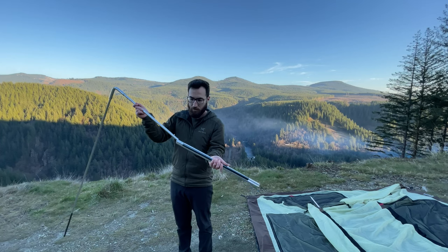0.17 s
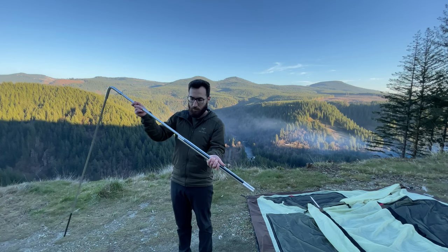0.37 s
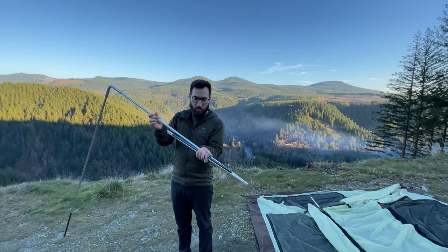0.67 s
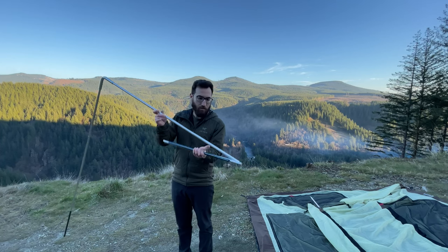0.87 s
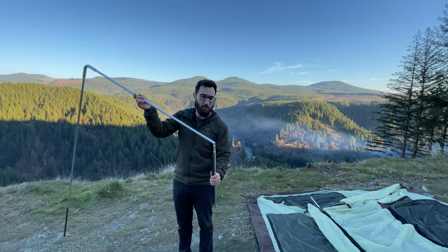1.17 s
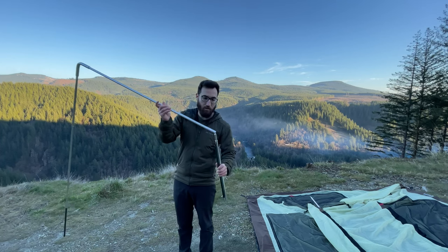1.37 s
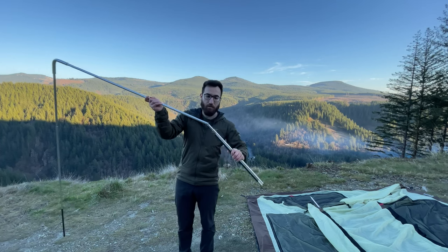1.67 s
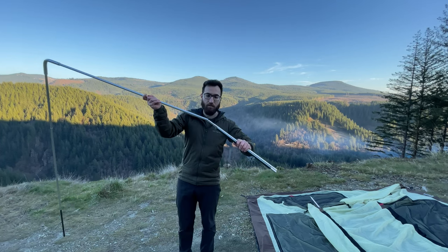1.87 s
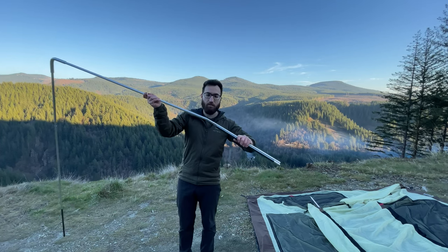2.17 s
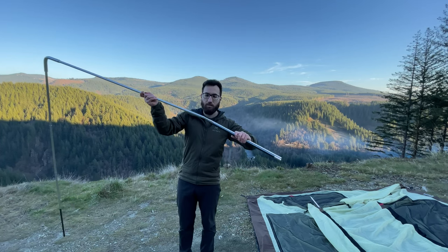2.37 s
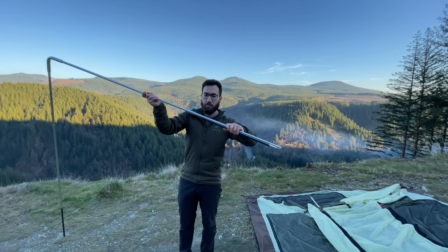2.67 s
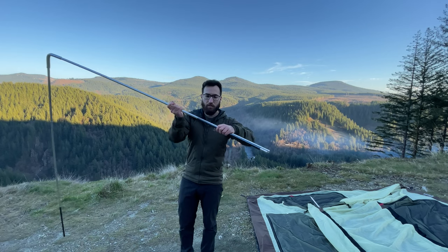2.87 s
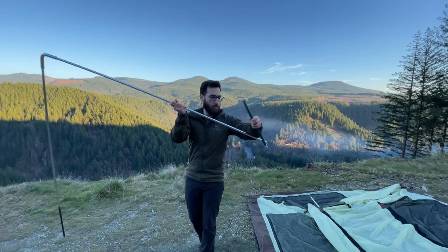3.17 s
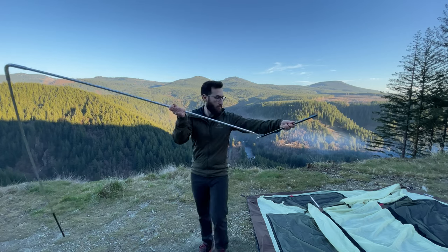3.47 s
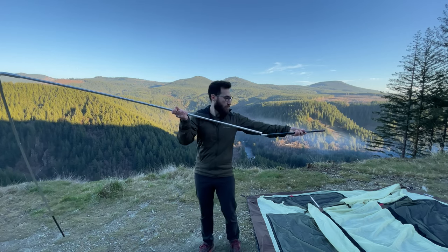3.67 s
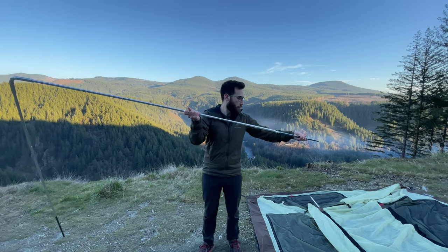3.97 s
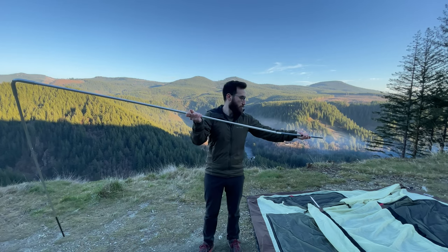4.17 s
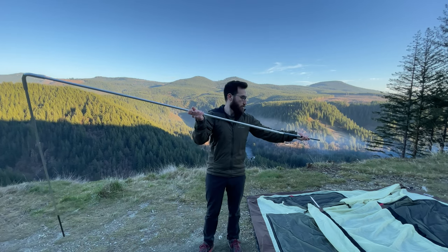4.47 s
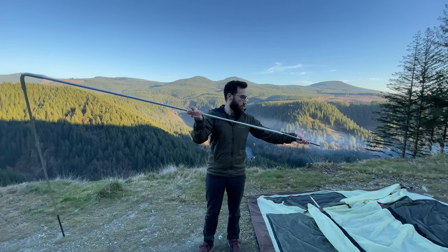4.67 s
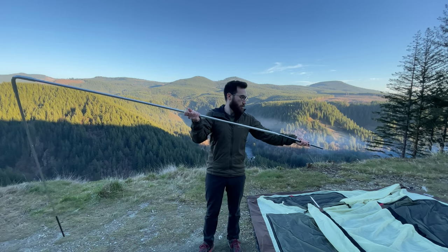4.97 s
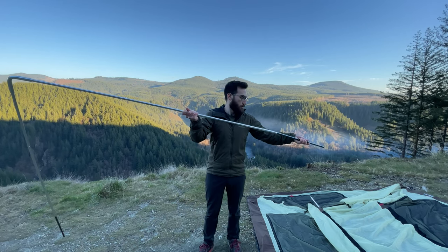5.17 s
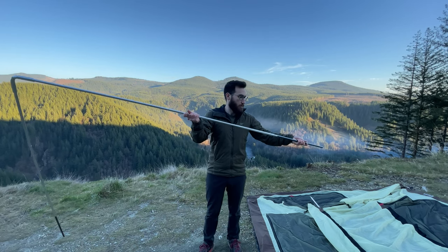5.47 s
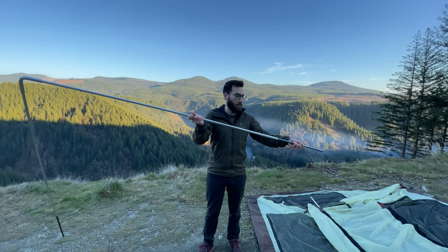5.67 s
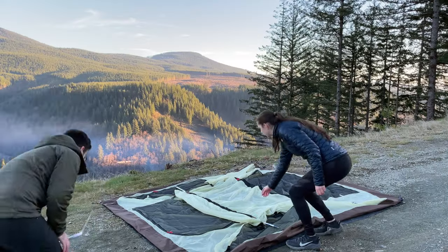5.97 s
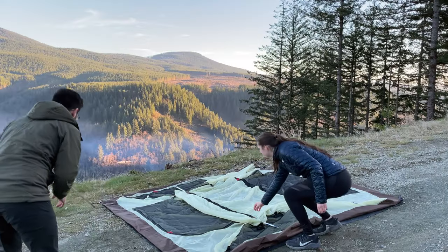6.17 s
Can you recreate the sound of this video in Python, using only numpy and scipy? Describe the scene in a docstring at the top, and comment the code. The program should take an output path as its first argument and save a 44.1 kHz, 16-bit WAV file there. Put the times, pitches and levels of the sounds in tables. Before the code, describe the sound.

A few metres away on an open hillside, hollow aluminium pole sections are fitted together. A flurry of clicks ends in a hard snap, then lighter taps, scrapes and a loose ringing rattle follow. Further loud snaps come at uneven gaps, with quiet handling and sleeve rustle between. A faint valley hush and low wind thumps sit beneath; the stereo pickup briefly overloads on the sharpest snap.

```python
"""Tent poles on a hillside

Aluminium pole sections snap together on their cord, a few metres from two microphone ports on an open hillside.
Knocks and slides are trains of uneven contacts ringing the hand-damped modes of the tube; a section loose on
the cord rings longer. Between them the tube creeps, sleeves rustle and handling ticks faintly, all shaped noise
or sparse clicks. A valley hush of banded noise lies below; low noise swings are wind on the ports and the
overload rumble under the loudest snaps."""
import sys
import numpy as np
from scipy import signal
from scipy.io import wavfile
from scipy.ndimage import uniform_filter1d

SR = 44100
rng = np.random.default_rng(int(sys.argv[2]) if len(sys.argv) > 2 else 0)


def materialize(psi):
    """Save the field psi as 16-bit PCM at rate SR to the path in sys.argv[1].

    A 1-D psi becomes a single channel; in a 2-D psi each row is a channel.
    """
    bounded = np.clip(np.atleast_2d(psi).T, -1, 1)
    quanta = np.round(bounded * 32767).astype(np.int16)
    wavfile.write(sys.argv[1], SR, quanta)


N = 278488  # samples, about 6.3 s

# Valley hush below the slope. Each row: time in seconds, level in dB.
HUSH_LEVEL = [(0.0, -47.5), (0.63, -45.5), (2.83, -45), (3.02, -44), (3.65, -43.5), (4.15, -45),
              (4.85, -44.5), (6.31, -44.5)]
# Its colour. Each row: frequency in Hz, relative density in dB per Hz.
HUSH_COLOUR = [(47, -42.5), (80, -9.5), (291, -1.5), (355, 9.5), (441, -13), (515, -5), (669, -7.5),
               (780, -9.5), (870, -9), (1640, -19), (2230, -43.5), (15000, -84.5)]
# How alike the two ports hear hush and rustle. Each row: frequency in Hz, likeness from -1 to 1.
PORT_LIKENESS = [(60, -0.32), (130, 0.77), (290, 0.6), (640, 0.26), (1410, 0.17), (3100, 0.72),
                 (6820, 0.07), (15000, 0.36)]
# Breeze on the ports. Each row: time in seconds, flutter level in dB, rumble level in dB.
BREEZE = [(0.0, -60, -77), (0.32, -61.5, -80.5), (1.02, -55, -77), (1.14, -54, -71), (1.3, -61, -69.5),
          (1.56, -82.5, -95.5), (1.77, -80, -95.5), (2.07, -62.5, -92), (2.48, -70, -99), (3.27, -60, -91),
          (3.65, -60, -77), (3.9, -63.5, -90.5), (4.32, -64, -92), (4.66, -63, -75.5), (5.17, -53.5, -66),
          (5.52, -62.5, -75), (6.12, -58.5, -82), (6.31, -61, -67)]
# Short low thumps: gusts on the ports, and the overload rumble under the loudest snaps.
# Each row: centre in seconds, rumble in dB, flutter in dB, length in ms, left over right in dB.
THUMPS = [(.03, -49, -59, 35, -2), (.545, -50, -59, 51, -5), (.615, -55, -35, 45, 2),
          (.70, -82, -35, 53, 2), (1.0, -55, -45, 190, 4.5), (1.111, -61, -38.5, 110, 1.5),
          (1.25, -73, -40, 170, 7.5), (1.345, -36, -41.5, 81, 14), (1.40, -48, -50, 56, 7),
          (1.88, -62.5, -48, 51, 4), (2.681, -59, -58, 72, 5.5), (3.57, -72, -40.5, 380, 3.5),
          (3.86, -70, -45.5, 45, 6), (4.55, -65, -54.5, 165, 16), (4.73, -59, -57, 54, 7.5),
          (4.88, -62, -42, 44, 8), (4.95, -50, -47, 250, 6.5), (5.093, -34, -35.5, 74, 5),
          (5.22, -69, -44, 47, -5.5), (5.379, -76.5, -42.5, 60, 1), (5.78, -57.5, -63.5, 98, -2),
          (6.25, -54, -61, 110, -6.5)]
# Handling. Each row: time in seconds, level of the creeping tube in dB, level of the sleeve rustle in dB.
HANDLING = [(0.0, -72, -78), (0.14, -67.5, -96), (0.26, -59, -86), (0.41, -60, -81), (0.55, -47, -74),
            (0.81, -66, -66), (1.02, -53.5, -78), (1.2, -68, -73), (1.53, -53, -73), (1.67, -62.5, -89),
            (1.8, -69, -96.5), (2.52, -65, -88), (2.67, -55, -58), (2.78, -56.5, -65), (3.14, -58, -65),
            (3.4, -62.5, -67), (4.05, -64, -80.5), (4.26, -74, -82), (5.02, -84, -90.5), (5.22, -63, -80),
            (5.46, -65, -72.5), (5.84, -64, -85.5)]
# Handling over the last half second, columns as above.
HANDLING_END = [(5.855, -58, -62), (6.063, -61, -59.5), (6.31, -56, -66)]
# Colour of the rustle as it reaches the ear. Each row: frequency in Hz, relative density in dB per Hz.
RUSTLE_COLOUR = [(1180, -37), (2000, -16.5), (2470, -10), (3800, -17), (6530, -14.5), (8190, -26),
                 (9580, -3.5), (13000, -7)]
# Ringing of a section hanging loose on the cord. Each row: start in seconds, level in dB.
LOOSE_KNOCKS = [(0.873, -43), (0.979, -35), (2.889, -50), (2.9987, -50), (3.03, -49.5), (3.153, -42),
                (4.4865, -34.5), (5.9313, -50)]
# Its modes. Each row: frequency in Hz, relative level in dB, time to fall 60 dB in seconds.
LOOSE_MODES = [(2630, -1.5, 0.061), (2890, 0, 0.052), (3634, -1, 0.08), (4690, -4, 0.054),
               (5300, -5.5, 0.062), (5600, -14, .045), (6930, -3, 0.041)]
# Modes of the hand-held tube. Each row: frequency in Hz, relative level in dB.
TUBE_MODES = [(350, -19), (520, -15.5), (700, -17.5), (900, -15.5), (1110, -0.5), (1310, -10), (1550, 4),
              (1850, 1), (2100, 3.5), (2370, 5.5), (2630, 3.5), (2900, 2), (3250, -1), (3550, -0.5),
              (3900, 0.5), (4200, -1.5), (4550, -0.5), (4900, -14.5), (5260, 0), (5600, -2), (6030, 0),
              (6660, -0.5), (7070, -7.5), (7700, -14), (8840, -9.5), (9450, -5.5), (10100, -5.5),
              (11300, -5), (11900, -20), (13500, -18.5), (15300, -6.5)]
# Slides of tube through ferrule and hand. Each row: time in seconds, level in dB, favoured pitch in Hz, modes
# near 2.5 kHz and near 10 kHz against those near 6 kHz in dB, rattle time in ms.
SLIDES = [(.432, -41.5, 5440, 9, -7, 17), (.455, -36.5, 2290, -11, -2, 28),
          (.79, -46, 3020, -5, -4, 180), (.85, -35.5, 1820, -14, -12, 29),
          (.875, -34.5, 2880, 1, -17, 14), (1.07, -48.5, 5370, -1, -8, 65),
          (2.655, -32, 5850, -11, -4, 35), (2.90, -41, 3500, -4, 6, 16),
          (3.05, -50, 2530, 15, -16, 41), (3.22, -46, 2300, -1, -8, 50),
          (3.275, -42.5, 1300, 14, -19, 46), (3.44, -45.5, 2380, 3.5, 24.5, 19),
          (3.668, -38, 1550, 0.5, 20.5, 41), (3.75, -50.5, 4960, -3.5, -5.5, 64),
          (3.82, -46.5, 6220, -4, -3, 19), (3.865, -50, 4400, 2.5, -13, 14.8),
          (4.476, -41, 4400, -2, -17, 8.6), (5.535, -38, 5243, -11.5, 11.5, 57),
          (5.94, -49, 5240, -8, 2, 28), (6.075, -43.5, 4200, 1, 15, 50),
          (6.22, -47, 5440, -12, 18.5, 47), (6.28, -44.5, 4120, 9, 19, 46)]
# Knocks of tube on tube, columns as for the slides.
KNOCKS = [(.194, -28, 2274, 4, -14, 1.6), (.2473, -25.5, 2630, -8, -19, 4.2),
          (.3044, -31, 1820, -14, -15, 3.1), (.3115, -24, 5660, -12, -21, 1.7),
          (.3196, -17, 5700, -13.5, -6, 3.3), (.3245, -24.5, 6300, -12, -5, 3.7),
          (.4459, -17, 5680, -13, 0, 2.8), (.4744, -37, 2410, 5, 12, 1.7), (.505, -23, 2630, -1, -9, 1.2),
          (.5418, -6, 2700, -5, 8.5, 3.8), (.5472, -8, 2237, -7.5, -7, 2.7),
          (.585, -30, 2336, -8, -12, 2.7), (.9312, -52, 4910, -10, 10, 2.7),
          (.9514, -40, 5130, -4, 10, 2.1), (.9783, -22.5, 2670, -9, -1, 2.5),
          (1.132, -23.5, 1950, -6.5, -4.5, 4.2), (1.202, -41.5, 2960, -3, -12, 1.3),
          (1.211, -37, 4200, -5, -21, 0.94), (1.239, -44, 4330, -9, -8, 3.4),
          (1.249, -44, 3500, -5, -8, 1.3), (1.4254, -41, 4400, -12, -10, 1.5),
          (1.5125, -35, 4200, -6, 1, 0.87), (1.54, -37.5, 1780, -3, -1, 0.82),
          (1.572, -28, 2540, -3, -26, 1.37), (1.6098, -44, 3860, -15, -11, 3.6),
          (1.6426, -39, 2490, -13.5, -6.5, 2.1), (2.0218, -41.5, 2050, 0, -12.5, 1),
          (2.059, -41.5, 1990, -4, -1, 3.8), (2.0756, -29.5, 2220, -1, -4, .92),
          (2.169, -14, 6940, -10, 0.5, 1.55), (2.4632, -47, 1910, -6, 6, 3.2),
          (2.4758, -42, 2900, 6.5, 7, 0.94), (2.526, -46.5, 2790, -5, 0.5, 9),
          (2.58, -44, 2210, -12, -6, 5.2), (2.675, -5.5, 2390, -6.5, 10, 3.8),
          (2.68, -6, 2670, -17, 0, 4.8), (2.7994, -44.5, 2420, -15, -19, 2.5),
          (2.891, -37.5, 4500, -15, -6, 5.2), (2.9487, -47, 1710, -17, -9, 2.9),
          (2.9987, -34, 3470, -12, -8, 5.2), (3.028, -34, 2630, -5, -5, 9.4),
          (3.1535, -42, 2560, -1, -20.5, 3.1), (3.176, -38, 2960, 3.5, -6, 3.7),
          (3.9761, -18.5, 4510, -15.5, -6.5, 2.6), (4.1616, -24.5, 2120, -8.5, -14, 3),
          (4.4885, -13, 5940, -7, 3.5, 2.9), (5.1294, -58.5, 1580, -5.5, -13.5, 2.4),
          (5.1756, -50.5, 1543, 7, -17.5, 1.8), (5.218, -48.5, 1878, 5.5, -23.5, 2),
          (5.2772, -40, 4730, -10, -0.5, 0.81), (5.344, -49, 1566, -4, -5, 1.8),
          (5.3594, -50, 1700, -11.5, 10, 3), (5.4096, -54.5, 1520, -11, -2.5, 2.6),
          (5.5692, -1.5, 7200, -23.5, -2.5, 2.6), (5.5752, -16, 6040, -1.5, 1, 2.7),
          (5.8506, -51.5, 1560, -9, 7, 2.7), (5.8835, -44.5, 1600, 0, 6, 2.4),
          (5.9306, -45, 5800, -9.5, -6, 3.1), (5.972, -51, 4300, -2.5, -4, 2.5),
          (6.11, -39.5, 4140, -7, -21, 2.3), (6.1566, -42, 1590, 4, -12, 5.9)]

LUMPY_DB, LUMPS_PER_S = 7, 18  # spread of the wind level, and how fast it wanders
WIND_LEFT_DB, VEER_DB = 3.5, 2.5  # breeze, left over right, and its wandering
GROUND_S, GROUND_DB = .0056, -13  # delay and level of the ground echo
SLOPE_T60_S, SLOPE_DB = .36, -32.5  # time for the slope scatter to fall 60 dB, and its level
GRIP_T60_S = .014  # hands damp a 2.5 kHz mode by 60 dB in this time, higher ones faster
PORT_LEAD_S = .00002  # the left port hears the pole first by this much
PORT_TURN = 0.39  # radians: the left is turned ahead by this, the right back by as much
POLE_LEFT_DB, POLE_SWAY_DB = 2.5, 1.2  # pole, left over right, and its spread from touch to touch
SOFT_DB, THINNING = -40, .35  # above this level, modes near 1.4 kHz lose so many dB per dB of strength
LOW_SHARE = 0.81  # modes near 1.4 kHz follow those near 2.5 kHz by this share
DIP_4K_DB = 1  # modes near 4 kHz, added to half the 2.5 kHz strength
CUTOFF_HZ = 16400  # the recorder is 60 dB down from here up


def from_db(db):
    """Decibels to gain."""
    return 10 ** (np.asarray(db) / 20)


def rms_one(x):
    """Scales to unit rms."""
    return x / np.sqrt(np.mean(x ** 2) + 1e-20)


def in_time(rows):
    """Columns of a curve table, one value a sample."""
    s, *columns = np.transpose(rows)
    return [np.interp(np.arange(N) / SR, s, column) for column in columns]


def at_hz(points, hz):
    """Reads a spectrum table on a log-frequency axis."""
    f, value = np.transpose(points)
    return np.interp(np.log(hz), np.log(f + 1), value)


def band(x, low_hz, high_hz):
    """Band-pass."""
    return signal.sosfilt(signal.butter(2, [low_hz, high_hz], "band", fs=SR, output="sos"), x)


def drift(rate_hz):
    """Slow random wandering of spread 1: noise smoothed twice, one value every 40 samples, then joined up."""
    r = np.exp(-80 * np.pi * rate_hz / SR)
    noise = rng.standard_normal(N // 40 + 2002)
    slow = signal.lfilter([1], [1, -2 * r, r * r], noise)[2000:]  # settled part only
    return np.interp(np.arange(N) / 40, np.arange(len(slow)), rms_one(slow))


def banded_noise(spectrum, patchy_db, flicker_hz):
    """Half-octave bands of stereo noise, each with its own level, flicker and likeness; rms 1."""
    out = 0
    together = drift(flicker_hz)
    edges = 60 * 2 ** np.arange(0, 8.3, .5)
    white = rng.standard_normal((2, 2, N))
    for k, (low, high) in enumerate(zip(edges, edges[1:])):
        mid, side = band(white[k % 2], low, high)
        hz = np.sqrt(low * high)
        alike = np.clip(at_hz(PORT_LIKENESS, hz), -1, 1)
        flicker_db = patchy_db * (together + drift(flicker_hz))
        gain = from_db(at_hz(spectrum, hz) + flicker_db)
        out = out + gain * (np.sqrt(1 + alike) * mid + np.sqrt(1 - alike) * side * [[1], [-1]])
    return rms_one(out)


def valley_hush():
    """Distant hush from below: gently flickering banded noise without its lowest bass, a little to the left."""
    hush = from_db(in_time(HUSH_LEVEL)[0]) * banded_noise(HUSH_COLOUR, patchy_db=0.89, flicker_hz=8.8)
    high_pass = signal.butter(8, 125, "high", fs=SR, output="sos")
    return signal.sosfilt(high_pass, hush) * from_db([[1.2], [-1.2]])


def wind_and_thumps():
    """Lumpy low swings of wind, with short thumps of gusts and overload, partly opposed between the two ports."""
    flutter_db, rumble_db = np.array(in_time(BREEZE)) + LUMPY_DB * drift(LUMPS_PER_S)
    pan_db = WIND_LEFT_DB + VEER_DB * drift(LUMPS_PER_S)
    sides = np.array([[.5], [-.5]])
    swings = from_db(np.stack([rumble_db, flutter_db])[:, None] + sides * pan_db)
    for s, low_db, high_db, ms, left_db in THUMPS:
        bump = np.exp(-2 * ((np.arange(N) / SR - s) * 2000 / ms) ** 2)
        swings = swings + from_db(np.reshape([low_db, high_db], (2, 1, 1)) + sides * left_db) * bump
    shared = rng.standard_normal((2, N))
    own = rng.standard_normal((2, 2, N))
    push = 0.95 * shared[:, None] * [[1], [-1]] + own
    rumble = rms_one(band(band(band(push[0], 39, 75), 46, 110), 38, 100))
    flutter = rms_one(band(band(push[1], 85, 240), 74, 250))
    return swings[0] * rumble + swings[1] * flutter


def hillside(x):
    """Open-air surroundings: one dulled echo off the ground, then faint scatter from slope and trees."""
    lag = round(GROUND_S * SR)
    ground = band(np.pad(x, ((0, 0), (lag, 0)))[:, :N], 910, 12000)
    t = np.arange(SR // 2) / SR
    scatter = band(rng.standard_normal((2, len(t))), 2000, 10000)
    scatter = scatter * from_db(-60 * t / SLOPE_T60_S) * (t > .012)
    scatter = scatter / np.sqrt(np.sum(scatter ** 2) / 2)
    blurred = x * rms_one(band(rng.standard_normal(N), 100, 2000))  # stirring foliage smears the tones
    slope = signal.fftconvolve(blurred, scatter, axes=1)[:, :N]
    return x + from_db(GROUND_DB) * ground + from_db(SLOPE_DB) * slope


def sleeve_rustle(level_db):
    """Rustle of the sleeves: flickering banded noise, steeply cut above 13 kHz."""
    rustle = from_db(level_db) * banded_noise(RUSTLE_COLOUR, patchy_db=1.2, flicker_hz=15)
    return signal.sosfilt(signal.butter(10, 13000, fs=SR, output="sos"), rustle)


def handling_ticks(level_db):
    """Faint ticks of handling, tube and sleeve together: sparse tiny clicks, in clumps."""
    chance = 250 * from_db(5.0 * drift(8)) / SR  # about 250 a second, more in the clumps
    sizes = from_db(3.3 * np.minimum(rng.exponential(1, N), 4))
    ticks = (rng.random(N) < chance) * sizes * rng.choice([-1, 1], N)
    click = band(ticks + 1e-18, 1500, 6600)
    return from_db(level_db) * rms_one(click) * from_db([[1.5], [-1.5]])


def tube_ring(gain_db, size=1024, count=3):
    """One tap as it reaches each port: neighbouring sections ring each mode slightly apart, from different spots."""
    mode_hz, mode_db = np.transpose(TUBE_MODES)
    hz = np.repeat(mode_hz, count)[:, None]
    level_db = np.repeat(mode_db + gain_db, count)[:, None]
    hz = hz * (1 + .03 * rng.standard_normal(hz.shape))
    t = np.arange(size) / SR
    # half of the phase difference between the ports
    lead = PORT_TURN + np.pi * hz * PORT_LEAD_S + .3 * rng.standard_normal(hz.shape)
    fade = from_db(level_db - 60 * t / GRIP_T60_S * np.sqrt(hz / 2500))
    start = rng.uniform(0, 2 * np.pi, hz.shape)
    return np.sum(fade * np.sin(2 * np.pi * hz * t + start + np.stack([lead, -lead])), axis=1)


def creeping(level_db):
    """Faint gritty slips of the tube in the hands; the grip shifts, so four settings of the modes share them."""
    grit_db = 5.6 * np.minimum(rng.exponential(1, N), 6) + 1.0 * drift(40)
    slips = rng.choice([-1, 1], N) * from_db(grit_db)
    grip = rng.integers(0, 4, N // 2000 + 1).repeat(2000)[:N]  # dealt anew every 2000 samples
    ring = 0
    for k in range(4):
        tap = tube_ring(np.zeros(len(TUBE_MODES)))
        ring = ring + signal.oaconvolve(tap, (slips * (grip == k))[None], axes=1)
    creep = rms_one(band(band(ring[:, :N], 1200, 8600), 900, 8800))
    return from_db(level_db) * creep * from_db([[1.5], [-1.5]])


def loose_section():
    """Lightly damped modes of a section loose on the cord, struck with new strengths each time."""
    t = np.arange(SR // 4) / SR
    out = np.zeros((2, N + SR))
    hz, level_db, t60 = np.transpose(LOOSE_MODES)[:, :, None]
    for s, db in LOOSE_KNOCKS:
        spread_db = rng.normal(0, 4.7, hz.shape)
        start = rng.uniform(0, 2 * np.pi, hz.shape)
        phase = 2 * np.pi * hz * t + start + np.reshape([PORT_TURN, -PORT_TURN], (2, 1, 1))
        fade = from_db(db + level_db + spread_db - 60 * t / t60)
        i = round(s * SR)
        out[:, i:i + len(t)] += np.sum(fade * np.sin(phase), axis=1)
    return out[:, :N] * from_db([[POLE_LEFT_DB / 2], [-POLE_LEFT_DB / 2]])


def touches(rows, lumpy_db, rise_ms, sag_db, release_db_per_ms, top_hz):
    """Each touch: uneven contacts lasting its rattle time, each with its own balance of mode strengths."""
    hz = np.array(TUBE_MODES)[:, 0]
    ms = np.arange(7000) * 1000 / SR
    out = np.zeros((2, N + 8192))
    for s, peak_db, pitch, body_db, high_db, rattle_ms in rows:
        low_db = LOW_SHARE * body_db - THINNING * max(peak_db - SOFT_DB, 0)
        pan_db = rng.normal(POLE_LEFT_DB, POLE_SWAY_DB)
        favour_db = 11.0 * np.exp(-(np.log2(hz / pitch) / 0.087) ** 2)  # modes close to the favoured pitch
        strengths = [(1400, low_db), (2500, body_db), (4000, body_db / 2 + DIP_4K_DB),
                     (6000, 0.0067), (10000, high_db)]
        ring = tube_ring(favour_db + at_hz(strengths, hz))
        signs = rng.choice([-1, 1], len(ms))
        sizes = signs * from_db(lumpy_db * np.minimum(rng.exponential(1, len(ms)), 6))
        ending_db = -sag_db * ms / rattle_ms - release_db_per_ms * np.maximum(ms - rise_ms - rattle_ms, 0)
        ending_db = np.maximum(ending_db, -17.0 - 0.97 * ms)  # the loose joint chatters on as it settles
        contacts = sizes * np.minimum(ms / rise_ms, 1) ** 2 * from_db(ending_db)
        sound = signal.fftconvolve(ring, contacts[None], axes=1)
        # each port is levelled by its loudest 100 samples
        loudest = np.sqrt(uniform_filter1d(sound ** 2, size=100, axis=1).max(axis=1, keepdims=True))
        level_db = peak_db + np.array([[pan_db / 2], [-pan_db / 2]])
        i = round((s - rise_ms / 2000) * SR)  # the listed time is halfway up the rise
        out[:, i:i + sound.shape[1]] += sound / loudest * from_db(level_db)
    return band(band(out[:, :N], 420, top_hz), 250, top_hz)


def slides():
    """Tube drawn through ferrule and hand: slow-rising, very uneven, gradually released."""
    return touches(SLIDES, lumpy_db=5.5, rise_ms=8.0, sag_db=4.5, release_db_per_ms=0.7, top_hz=11000)


def knocks():
    """Tube on tube: quickly rising, short rattles of contacts with a sharp release."""
    return touches(KNOCKS, lumpy_db=2.0, rise_ms=1.9, sag_db=6.5, release_db_per_ms=11.5, top_hz=19300)


def scene():
    """Hush, wind and thumps, the sleeves, and the pole with its echoes off the hillside."""
    creep_db, rustle_db = in_time(np.vstack([HANDLING, HANDLING_END]))
    background = valley_hush() + wind_and_thumps()
    handling = handling_ticks(creep_db - 13.5) + creeping(creep_db)
    pole = loose_section() + slides() + knocks()
    return background + sleeve_rustle(rustle_db) + hillside(handling + pole)


def record(dry):
    """The loudest snaps overload and clip flat; the top of the spectrum is cut."""
    cut = signal.cheby2(12, 60, CUTOFF_HZ, fs=SR, output="sos")
    return signal.sosfilt(cut, np.clip(dry, -.92, .92))


dry = scene()
out = record(dry)
materialize(out)
```